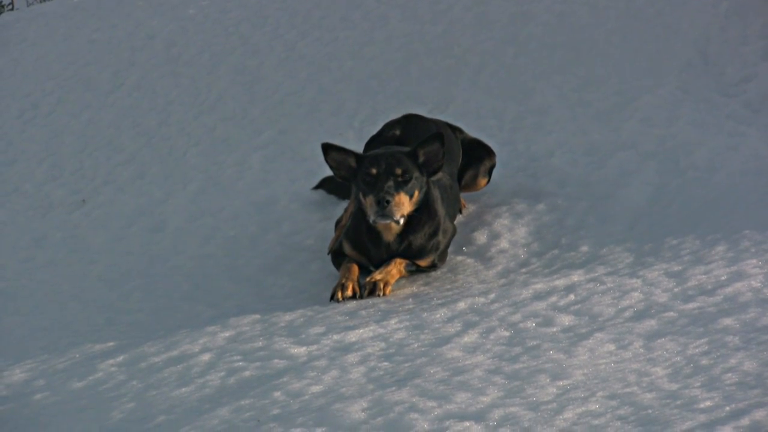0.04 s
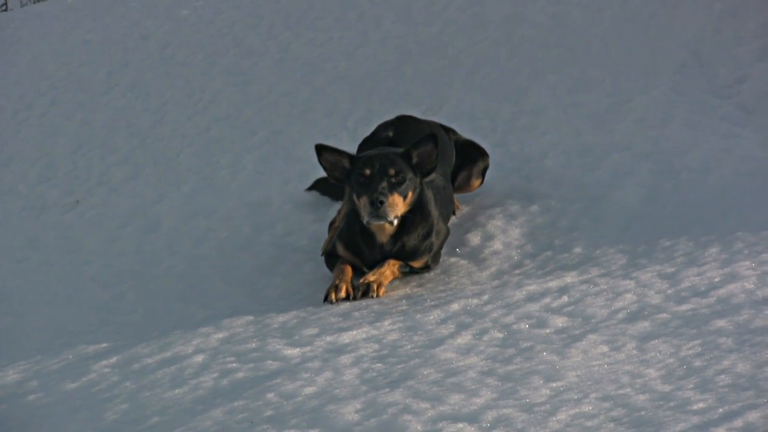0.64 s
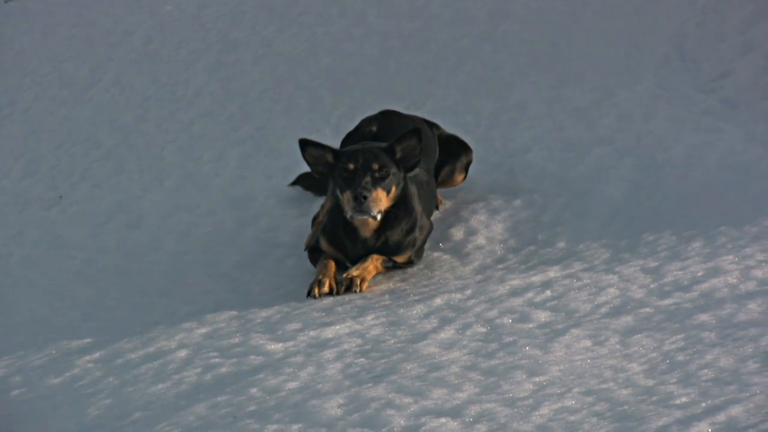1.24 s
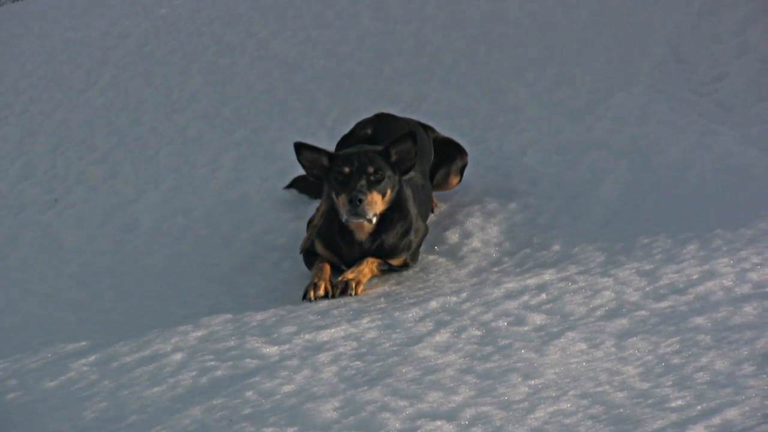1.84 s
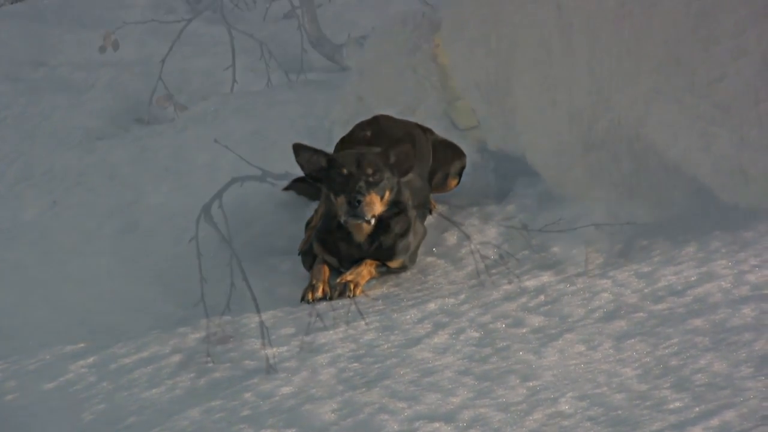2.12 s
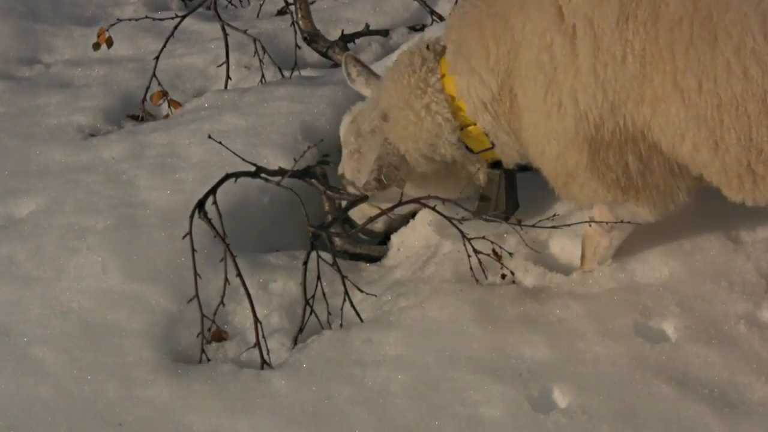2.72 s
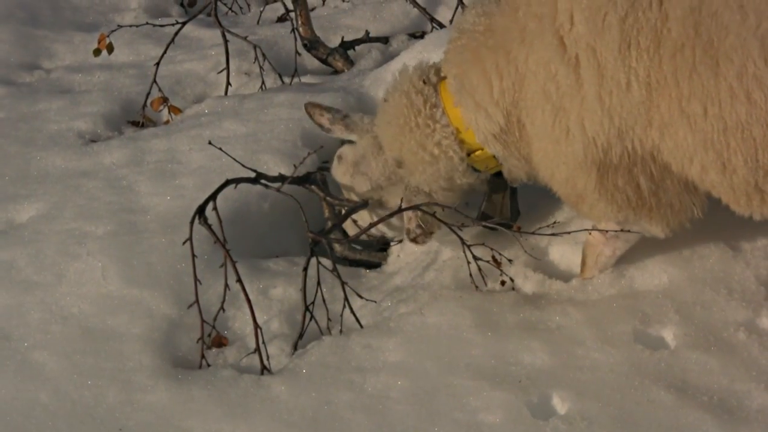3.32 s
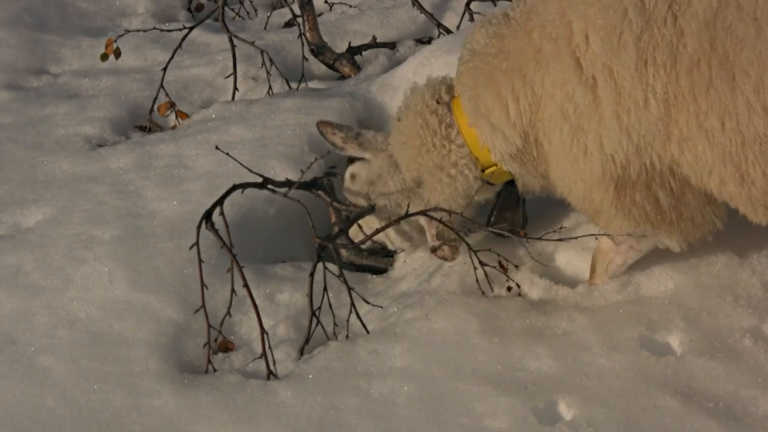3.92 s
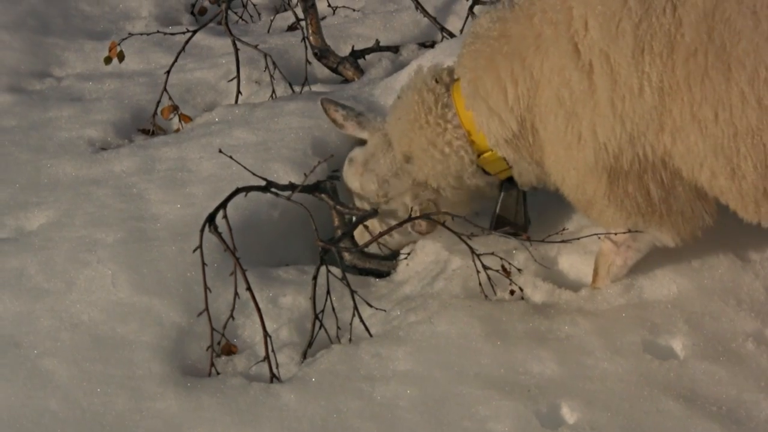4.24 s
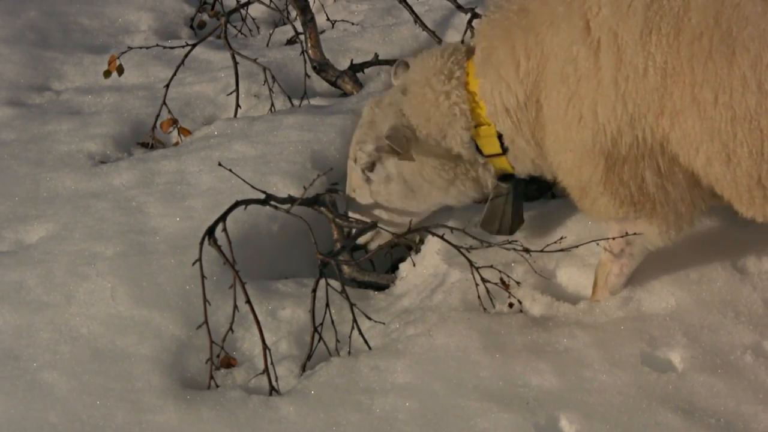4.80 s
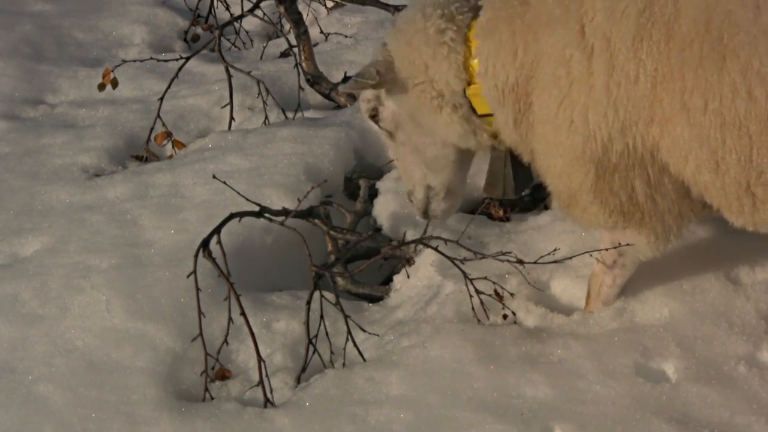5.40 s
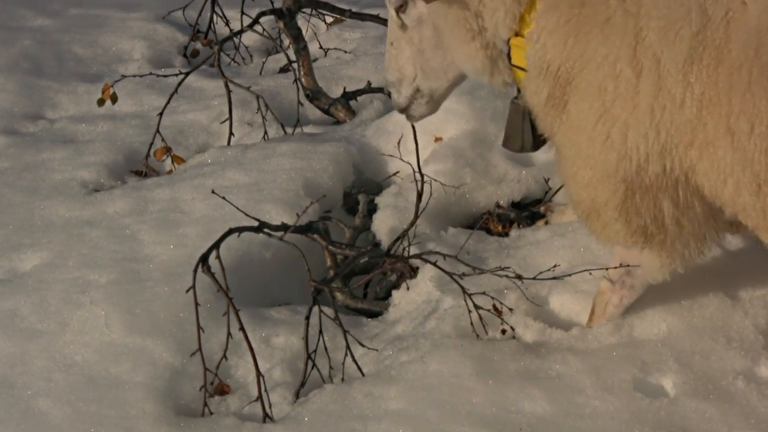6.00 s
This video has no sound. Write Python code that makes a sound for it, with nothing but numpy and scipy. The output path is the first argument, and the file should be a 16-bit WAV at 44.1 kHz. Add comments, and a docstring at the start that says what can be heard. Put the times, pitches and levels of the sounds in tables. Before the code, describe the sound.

Soft, distant wind blows outdoors in the snow, with a faint, high machine whine behind it. The wind deepens to a low rumble, and a sheep's sheet-metal collar bell gives a quick clatter close in front of the microphone. Twigs crackle lightly as the animal nibbles. Near the end the bell clanks several times, louder and unevenly, with clapper scrapes, rustling, a sharp twig snap and soft hoof thuds in snow.

```python
"""On a snowy slope, a sheep nibbles twigs among the bushes. As it moves its head, the clapper of the sheet-
metal bell on its collar hits the wall and clanks. Between the clanks the clapper scrapes the bell, twigs
crackle and hooves sink into the snow. Behind it a tape drive whines over a soft far wind, and between 1.7 and
2.7 s the background changes."""
import sys
import numpy as np
from scipy import signal
from scipy.fft import rfft, irfft, next_fast_len
from scipy.io import wavfile
from scipy.ndimage import map_coordinates

SR = 44100
rng = np.random.default_rng(int(sys.argv[2]) if len(sys.argv) > 2 else 0)


def master_out(mix):
    """Clip the mix to full scale and print it as 16-bit PCM to the path in sys.argv[1]."""
    frames = np.transpose(np.atleast_2d(mix))
    ceiling = np.clip(frames, -1, 1)
    pcm = np.round(ceiling * 32767).astype(np.int16)
    wavfile.write(sys.argv[1], SR, pcm)


N = 271656


def amp(db):
    """Turn decibels into a number to multiply by."""
    return 10 ** (np.asarray(db) / 20)


def unit(x):
    """Scale a sound to an average (rms) level of 1."""
    return x / np.sqrt(np.mean(x ** 2) + 1e-20)


def clock():
    """The time of every sample, in seconds."""
    return np.arange(N) / SR


def along(points, hz):
    """Read between (Hz, value) points, with all octaves equally wide."""
    freqs, values = np.transpose(points)
    return np.interp(np.log(hz + 1), np.log(freqs + 1), values)


def wobble(rate):
    """A smooth curve through `rate` random values a second."""
    return map_coordinates(rng.standard_normal(int(N * rate / SR) + 4), [clock() * rate])


def filtered(x, response):
    """Multiply each frequency in a sound by response(hz)."""
    n = x.shape[-1]
    padded = next_fast_len(n + SR // 4)
    return irfft(rfft(x, padded) * response(np.fft.rfftfreq(padded, 1 / SR)), padded)[..., :n]


def noise(spectrum, likeness, n=N):
    """Coloured stereo noise. Likeness 1 makes left and right the same, -1 opposite."""
    def response(hz):
        angle = np.arccos(np.clip(along(likeness, hz), -1, 1)) / 2
        return amp(along(spectrum, hz)) * [np.cos(angle), np.sin(angle)]
    mid, side = filtered(rng.standard_normal((2, n)), response)
    return unit(np.array([mid + side, mid - side]))


def near_noise(spectrum, n=N):
    """Noise from just in front: left and right are alike except in the high treble."""
    return noise(spectrum, [(2500, 1.0), (5000, 0.92), (9000, 0.8), (13000, .1)], n)


def tone(hz, waver, lag_rad=0):
    """A sine with a slightly unsteady pitch; the left side can lag behind."""
    cycles = rng.random() + np.cumsum(hz * (1 + waver * wobble(10))) / SR
    return np.sqrt(2) * np.sin(2 * np.pi * cycles + lag_rad * np.array([[-.5], [.5]]))


def swells(rows):
    """A loudness curve with one smooth hump for each row."""
    return sum(amp(db) * np.exp(-2 * ((clock() - middle) / length) ** 2) for middle, length, db in rows)


def add(track, start_s, sound):
    """Mix a sound into a track at the given time."""
    part = track[:, round(start_s * SR):][:, :sound.shape[1]]
    part += sound[:, :part.shape[1]]


def change_share(start_s=1.74, end_s=2.74):
    """Fade from 0 (before the background changes) to 1 (after it)."""
    return np.interp(clock(), (start_s, end_s), [0, 1])


# The whine's clearest tones. Each row: pitch in Hz, level in dB before the background changes, and level in dB
# after it.
WHINE_TONES = [(4060, -81, -71), (4500, -75, -74), (4678, -78, -77), (4926, -77, -77), (5098, -73, -71),
               (5190, -79, -79), (5399, -75, -71), (6002, -79, -77), (6298, -75, -73), (6450, -76, -77),
               (9394, -82, -82)]
# The colour of the gear noise. Each row: frequency in Hz, relative level in dB.
GEAR_COLOUR = [(2500, -5), (4000, 5), (5500, -12.5), (6500, 9), (7700, -14), (9400, 6.5), (11500, -55),
               (12500, -40)]

def tape_drive(turn_hz=30, gears_db=-63.5, flutter_db=2):
    """A few fluttering tones over many weak ones, as the gear noise repeats with every turn."""
    spectrum = rfft(rng.standard_normal((2, round(SR / turn_hz))))
    one_turn = irfft(spectrum * (rng.random(spectrum.shape[1]) < .3))  # keep about 30% of the tones
    turning = np.tile(one_turn, N // one_turn.shape[1] + 1)[:, :N]
    gears = unit(filtered(turning, lambda hz: amp(along(GEAR_COLOUR, hz))))
    whine = 0
    for hz, early_db, late_db in WHINE_TONES:
        db = early_db + (late_db - early_db) * change_share() + flutter_db * wobble(10)
        whine += amp(db) * tone(hz, waver=.0003, lag_rad=0.34)
    return amp(gears_db) * gears + whine


# The wind's colour before and after the background changes. Each row: frequency in Hz, relative level in dB.
EARLY_WIND = [(15, -59), (25, -26), (64, -18), (86, -8), (106, -30), (121, -15.5), (293, -8.5), (1060, -14),
              (1670, -29), (3010, -37), (5280, -33.5), (8100, -36), (10600, -34.5), (12100, -38),
              (15000, -95)]
LATE_WIND = [(15, -24), (25, -5.5), (64, 0), (125, -5.5), (213, -2.5), (286, -5), (318, -3.5), (529, -9),
             (621, -5.5), (729, -10), (1120, -10), (1310, -25), (5280, -28), (11500, -27.5), (15000, -74)]
# How alike left and right are for wind and hooves. Each row: frequency in Hz, likeness from -1 to 1.
LIKENESS = [(40, -0.54), (80, -0.23), (140, 0.077), (290, 0.63), (640, 0.88), (1400, 0.3), (3100, 0.31),
            (6800, -0.056), (12000, -0.46)]

def wind(early_db=-45, late_db=-44):
    """Far wind with a faint hum; its colour and hum change partway through."""
    early_wind = amp(early_db) * noise(EARLY_WIND, LIKENESS) + amp(-60) * tone(hz=96.5, waver=0.0084)
    late_wind = amp(late_db) * noise(LATE_WIND, LIKENESS)
    late_wind += amp(-61.5 + 0.86 * wobble(3.7)) * tone(hz=318, waver=0.0064)
    share = change_share()
    return (np.sqrt(1 - share) * early_wind + np.sqrt(share) * late_wind) * amp(0.16 * wobble(2.65))


# Hoof steps. Each row: middle in seconds, length in seconds, level in dB.
HOOF_STEPS = [(4.88, 0.043, -32.5), (5.26, 0.054, -40.5), (5.43, 0.058, -46), (5.98, 0.29, -49)]
# The colour of a thud. Each row: frequency in Hz, relative level in dB.
THUD_COLOUR = [(25, -19), (60, 10), (140, 3.5), (250, -36), (600, -57)]

def hooves():
    """Hooves sink into deep snow with soft thuds."""
    return swells(HOOF_STEPS) * noise(THUD_COLOUR, LIKENESS)


def crackle(per_second=1000, pitch_hz=3630, ring_cycles=4.3, spread_db=5, muffle_hz=10000):
    """Tiny cracks at random times, each ringing at its own pitch; snow muffles the highest treble."""
    count, samples = int(per_second * N / SR), np.arange(SR // 100)
    pitch, size = rng.standard_normal((2, count, 1)).clip(-2, 2)
    cycles = pitch_hz * np.exp(0.6 * pitch) * samples / SR
    rings = amp(spread_db * size) * np.exp(-cycles / ring_cycles) * np.sin(2 * np.pi * cycles)
    positions = rng.integers(0, N, (count, 1)) + samples
    cracks = np.bincount(positions.ravel(), rings.ravel(), N)[:N]  # add them all into one track
    return unit(filtered(cracks, lambda hz: 1 / (1 + (hz / muffle_hz) ** 10)))


# The colour of rubbing wool. Each row: frequency in Hz, relative level in dB.
RUB_COLOUR = [(700, -3), (1400, 5), (2600, -2), (3700, -12), (4800, -3), (8300, -8), (10500, -17),
              (14000, -35), (16000, -60)]
# The head brushes twigs and snow. Each row: middle in seconds, length in seconds, level in dB.
HEAD_BRUSHES = [(2.19, 0.072, -54.5), (2.77, 0.065, -53), (3.63, .08, -60), (4.68, 0.09, -45.5),
                (5.02, 0.095, -38.5), (5.37, 0.22, -38.5), (5.67, 0.18, -42), (5.85, 0.11, -46.5),
                (6.02, 0.087, -42.5)]
# Twigs breaking. Each row: start in seconds, relative level in dB, pitch in Hz.
TWIG_SNAPS = [(2.211, -32.5, 2490), (2.794, -29, 4000), (2.877, -35, 2600), (3.081, -39, 2500),
              (3.580, -26.5, 3200), (3.585, -27, 3640), (3.618, -34, 4000), (3.766, -39, 2300),
              (3.802, -39, 2600), (4.526, -34, 3970), (4.822, -24.5, 3740), (4.998, -27, 6000),
              (5.041, -29, 5000), (5.771, -13.5, 6800)]

def twigs(nibble_db=-58.5, snap_rise_s=0.00054, snap_fade_s=0.018):
    """Single snaps over a clumpy crackle of bark and snow and the rub of wool."""
    rub = unit(near_noise(RUB_COLOUR) * amp(2.5 * wobble(500)))
    rustle = unit((rub + amp(-3) * crackle()) * amp(2 * wobble(35)))
    out = (amp(nibble_db) * np.sqrt(change_share()) + swells(HEAD_BRUSHES)) * rustle
    t = np.arange(SR // 10) / SR
    for start, db, hz in TWIG_SNAPS:
        colour = [(hz / 6, -25), (hz / 2, -7), (hz, 0), (hz * 2, -13), (hz * 4, -36)]
        loudness = amp(db - 5 - 60 * t / snap_fade_s) * (1 - np.exp(-t / snap_rise_s))
        add(out, start, loudness * near_noise(colour, len(t)))
    return out


NOTE_HZ, HOLLOW_HZ = 922, 997  # the bell's main note, and the air in its mouth
# The tones of the bell's metal shell. Each row: pitch in Hz, seconds to fade by 60 dB,
# then relative level in dB when hit on the front wall, on the back wall and on the narrow side.
SHELL_TONES = [(624, 1.7, -40, -53, -58), (1425, .25, -42, -30, -30), (1755, .15, -17, -19, -31),
               (2005, .16, -36, -30, -35), (2445, .15, -35, -25, -32), (2640, .11, -34, -18, -35),
               (2738, .2, -26, -29, -32), (3367, .23, -22, -36, -35), (3815, .1, -32, -25, -38),
               (4080, .22, -36, -36, -29), (4228, .12, -21, -36, -44), (4487, .12, -32, -40, -40),
               (4967, .56, -31, -49, -53), (5376, .2, -28, -40, -28), (5549, .16, -29, -23, -29),
               (6002, .12, -35, -27, -45), (6152, .22, -29, -34, -43), (6250, .19, -50, -37, -40),
               (6543, .33, -41, -42, -46), (6891, .2, -35, -28, -46), (7457, .22, -24, -48, -52),
               (7575, .19, -36, -30, -30), (7716, .22, -34, -35, -50), (8365, .28, -46, -38, -40),
               (8610, .1, -38, -35, -38), (8886, .13, -41, -28, -52), (9040, .17, -38, -33, -50),
               (9360, .12, -39, -32, -43), (10200, .13, -39, -48, -42), (11220, .13, -53, -37, -49)]

def shell_ring(t, wall, bright_db_per_octave=1.43):
    """The spot that is hit decides how strongly each tone of the shell rings."""
    hz, fade_s, front, back, side = np.array(SHELL_TONES).T[:, :, None]
    wall_db = {"front": front, "back": back, "side": side}[wall]
    scatter_db, skew = rng.standard_normal((2, len(hz), 1))
    db = wall_db + scatter_db + bright_db_per_octave * np.log2(hz / np.median(hz))
    # short waves reach left and right out of step
    offset = np.multiply.outer([1, -1], skew) * 0.92 * (hz / hz.max()) ** 2
    phase = 2 * np.pi * rng.random(hz.shape) + offset
    return np.sum(amp(db - 60 * t / fade_s) * np.sin(2 * np.pi * hz * t + phase), axis=1)


# The clapper slides on the wall. Each row: middle in seconds, length in seconds, level in dB.
CLAPPER_SLIDES = [(2.478, 0.03, -44.5), (2.678, .022, -38), (2.74, 0.069, -47), (3.2, 0.078, -58.5),
                  (3.68, 0.035, -54), (3.88, 0.018, -48.5), (4.16, 0.038, -56), (4.74, 0.066, -41.5),
                  (4.96, 0.033, -34.5), (5.375, .073, -32), (5.63, 0.095, -35.5), (5.70, 0.025, -35.5),
                  (6.04, 0.03, -39.5)]

def scrapes(note_db=-27, slips_per_second=1200, spread_db=3, width_hz=20, dull_db_per_octave=1.5):
    """The clapper slides in tiny random slips; each rings the bell, with the high tones softened."""
    tones = [(NOTE_HZ, note_db)]
    for hz, _, front, back, _ in SHELL_TONES:
        tones.append((hz, (front + back) / 2 - dull_db_per_octave * np.log2(hz / NOTE_HZ)))

    def resonances(f):
        damping = 1j * f * width_hz
        return sum((-1) ** k * amp(db) * damping / (hz * hz - f * f + damping)
                   for k, (hz, db) in enumerate(tones))
    slips = (rng.random(N) < slips_per_second / SR) * rng.choice([-1, 1], N)
    sizes = amp(spread_db * rng.standard_normal(N))
    return swells(CLAPPER_SLIDES) * unit(filtered(slips * sizes, resonances))


# The colours of the clapper's clack and the seams' buzz. Each row: frequency in Hz, relative level in dB.
CLACK_COLOUR = [(600, -46), (880, -3), (1100, -16), (1500, -7), (2600, 7), (3600, -1), (4200, 9.5),
                (5100, -8), (7000, -3), (9300, -6), (10800, -13.5), (15000, -18), (17000, -42)]
BUZZ_COLOUR = [(700, -32), (1200, 10), (2600, 7), (4200, -0.5), (5100, 1.5), (7000, -26), (9300, 2.5),
               (10800, -7), (14000, -13), (16000, -51)]
# How loudly each wall clacks. Each entry: wall, relative level in dB.
WALL_CLACK_DB = {"front": -9.5, "back": -3.5, "side": 3}
# The clapper's hits. Each row: start in seconds, wall, relative level in dB of the shell
# and of the main note, seconds until the leaning clapper has choked that note by 20 dB.
CLAPPER_HITS = [(2.496, "back", -16.5, -23, 0.13), (2.505, "side", -4, -10, 0.038),
                (2.541, "back", -16, -23.5, 0.035), (2.57, "side", -15.5, -24, 0.024),
                (2.717, "back", -24, -38, .095), (4.501, "side", -30, -36.5, 0.076),
                (4.838, "front", .5, -16, 0.083), (5.150, "back", 1, -15.5, 0.16),
                (5.294, "side", 0.5, -5.5, .17), (5.51, "back", -8.5, -13.5, 0.07),
                (5.540, "front", 2.5, -20.5, .078), (5.933, "back", 0.5, -17, 0.16),
                (5.982, "front", -7, -25, 0.049)]

def bell(note_fade_s=0.79, hollow_fade_s=0.025, clack_fade_s=.024, buzz_fade_s=.14):
    """Each hit rings the shell and the main note, which dies early as the clapper leans on the wall."""
    note_rise_s, metal_rise_s, flare_s = .0006, .0003, .011
    # the small mouth lets out little below the main note
    mouth = signal.butter(6, 810, "highpass", fs=SR, output="sos")
    out, t = np.zeros((2, N)), np.arange(SR * 3 // 4) / SR
    for start, wall, shell_db, note_db, choke_s in CLAPPER_HITS:
        clack_db = WALL_CLACK_DB[wall] + 1.11 * shell_db  # hard hits clack more
        note_level = amp(note_db - 60 * t / note_fade_s - 20 * (t / choke_s) ** 3)
        note = note_level * np.cos(2 * np.pi * NOTE_HZ * t)
        # sound escapes easily from the open mouth, so the air there rings only briefly
        hollow = amp(clack_db - 4 - 60 * t / hollow_fade_s) * np.cos(2 * np.pi * HOLLOW_HZ * t)
        low_tones = signal.sosfilt(mouth, (note + hollow) * (1 - np.exp(-t / note_rise_s)))
        # the contact clacks, and the seams of the folded sheet buzz
        clack = amp(clack_db - 17 - 60 * t / clack_fade_s) * near_noise(CLACK_COLOUR, len(t))
        buzz = amp(-28.5 - 60 * t / buzz_fade_s) * near_noise(BUZZ_COLOUR, len(t))
        # sheet metal that is hit hard loses its first energy quickly
        flare = amp(3 * np.exp(-t / flare_s))
        metal = amp(shell_db - 1) * flare * (shell_ring(t, wall) + buzz) + clack
        add(out, start, low_tones + metal * (1 - np.exp(-t / metal_rise_s)))
    return out


# The stereo balance of bell and twigs. Each row: frequency in Hz, left level minus right level in dB.
SHEEP_BALANCE = [(900, 1.4), (2400, 0.1), (4400, 0.5), (8000, 2.5), (10500, -5), (14000, -13.5)]

def scene():
    """The sheep close in front, with wind and tape drive behind it."""
    sheep = bell() + scrapes() + twigs()
    sheep = filtered(sheep, lambda hz: amp(np.outer([.5, -.5], along(SHEEP_BALANCE, hz))))
    lean_left = amp([[.5], [-.5]])
    return sheep + (hooves() + wind()) * lean_left + tape_drive()


def record(dry, top_hz=16600):
    """Flatten peaks beyond full scale and cut off the very highest treble."""
    return filtered(np.clip(dry, -1, 1), lambda hz: hz < top_hz)


dry = scene()
out = record(dry)
master_out(out)
```